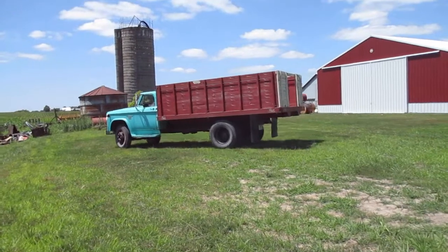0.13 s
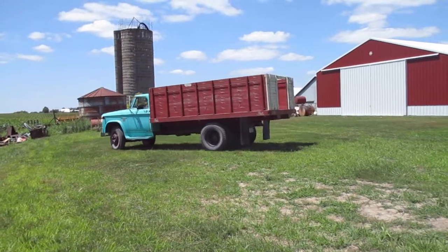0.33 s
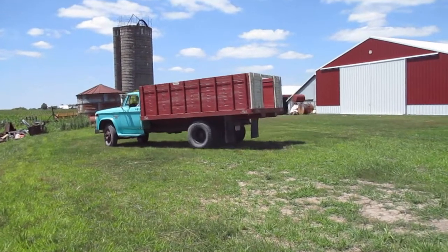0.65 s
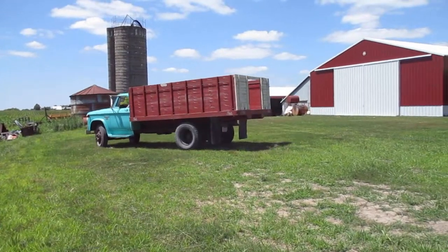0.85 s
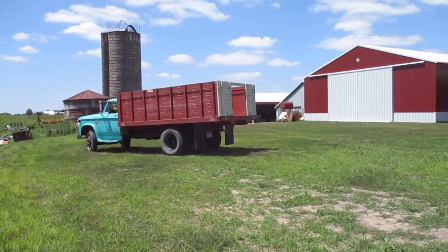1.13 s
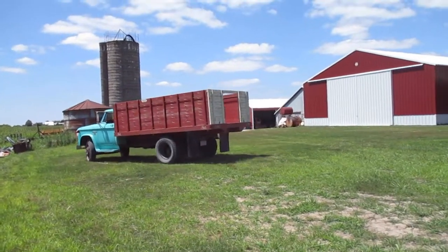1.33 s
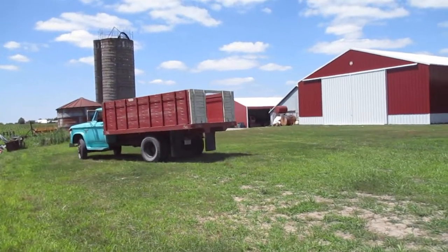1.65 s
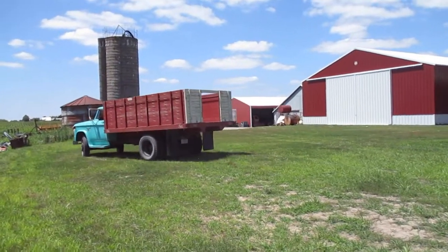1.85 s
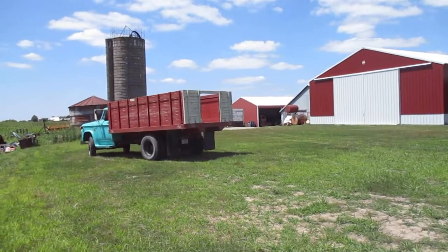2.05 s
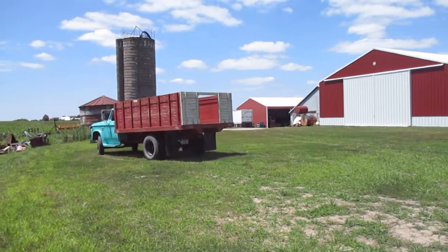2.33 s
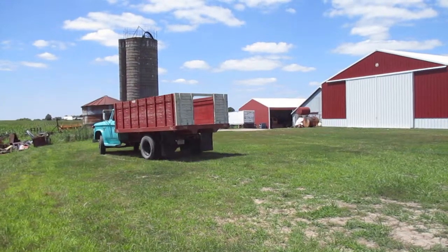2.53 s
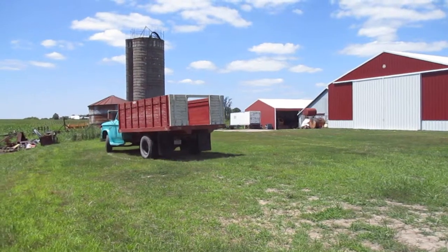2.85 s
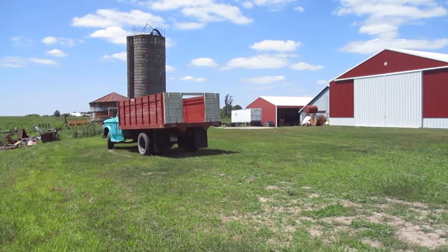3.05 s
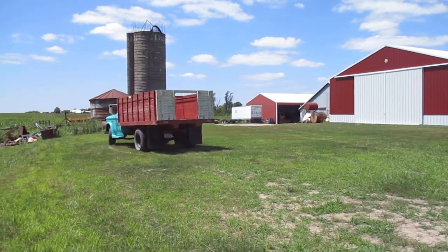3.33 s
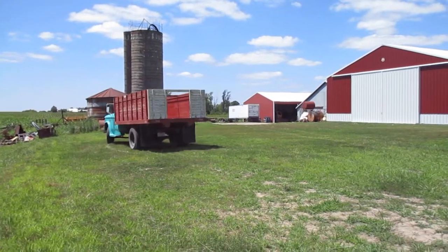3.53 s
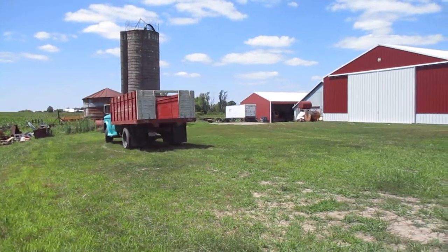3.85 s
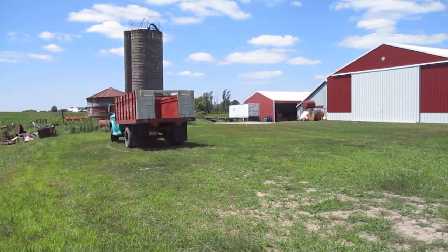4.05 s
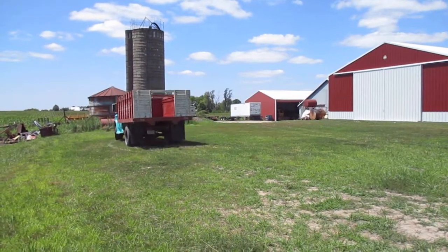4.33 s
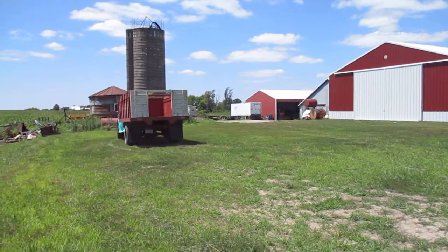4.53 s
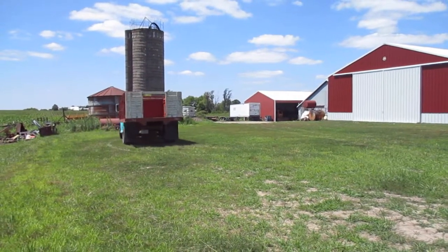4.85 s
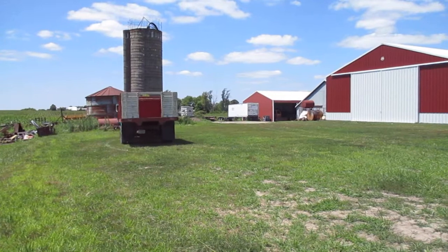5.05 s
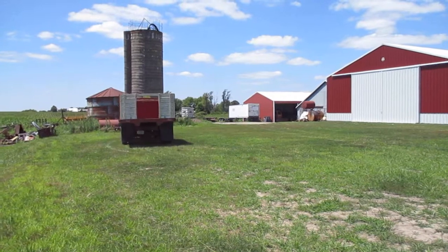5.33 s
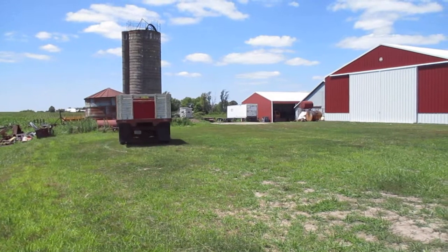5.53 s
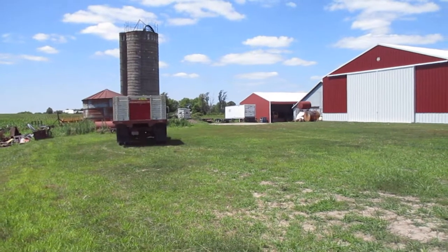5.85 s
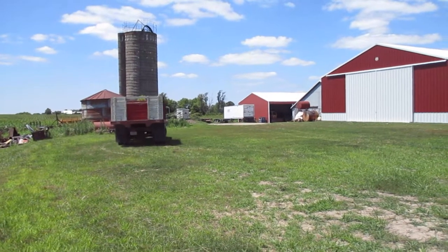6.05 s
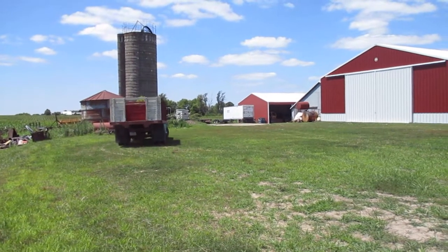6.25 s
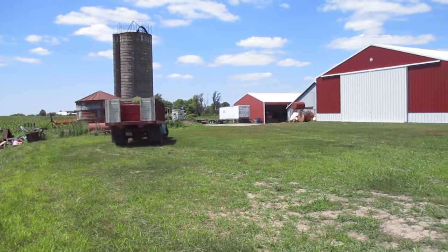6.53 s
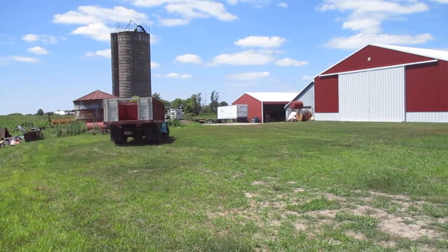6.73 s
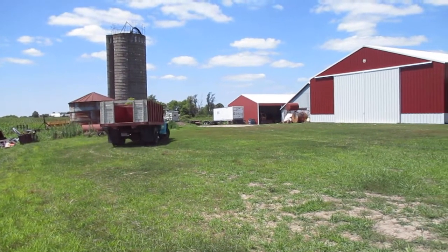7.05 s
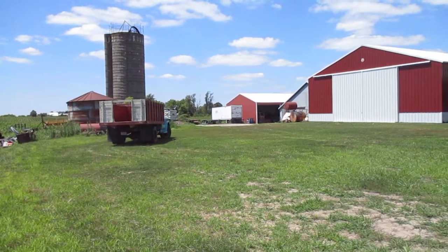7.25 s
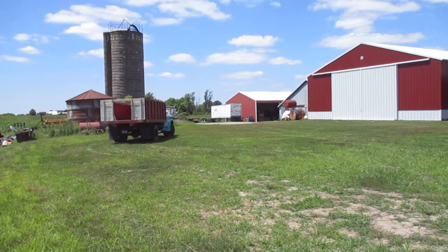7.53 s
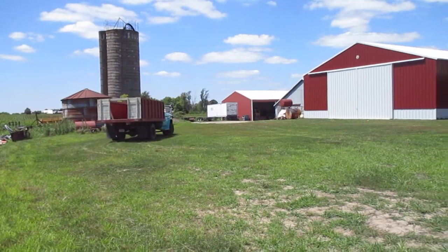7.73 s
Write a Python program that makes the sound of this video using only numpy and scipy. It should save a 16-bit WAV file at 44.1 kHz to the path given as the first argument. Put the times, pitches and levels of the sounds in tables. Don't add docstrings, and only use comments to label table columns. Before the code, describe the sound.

Outdoors on a grassy farm yard, an old petrol truck crawls away at steady low revs, its exhaust throbbing unevenly with ticking valves, hissing fan and buzzing panels. A few dry stalks snap near the microphone around two to three seconds. Later the engine softens and wind gusts thump the bare microphone, the hardest just after six seconds, briefly ducking the level. Thin high crickets and tiny bird whistles sit behind.

```python
import sys
import numpy as np
from scipy import signal
from scipy.io import wavfile
from scipy.ndimage import uniform_filter1d

SR = 44100
rng = np.random.default_rng(int(sys.argv[2]) if len(sys.argv) > 2 else 0)


def master(y):
    cut = np.clip(np.atleast_2d(y).T, -1, 1)
    pcm = np.round(cut * 32767)
    wavfile.write(sys.argv[1], SR, pcm.astype(np.int16))


def decibels_to_gain(level_db):
    exponent = np.asarray(level_db, float) / 20
    return 10 ** exponent


N = 348369


def rms_one(x):
    return x / np.sqrt(np.mean(x ** 2) + 1e-20)


def in_time(rows):
    s, *columns = np.transpose(rows)
    return [np.interp(np.arange(N) / SR, s, c) for c in columns]


def band(x, low_hz, high_hz, order=2):
    edges = [low_hz, min(high_hz, .45 * SR)]
    return signal.sosfilt(signal.butter(order, edges, "band", fs=SR, output="sos"), x)


def drift(rate):
    r = np.exp(-80 * np.pi * rate / SR)
    slow = signal.lfilter([1], [1, -2 * r, r * r], rng.standard_normal(N // 40 + 2002))[2000:]
    return np.interp(np.arange(N) / 40, np.arange(len(slow)), rms_one(slow))


def resonance(x, hz, width_hz):
    r = np.exp(-np.pi * width_hz / SR)
    poles = [1, -2 * r * np.cos(2 * np.pi * hz / SR), r * r]
    return signal.lfilter(np.array([1, 0, -1]) * (1 - r * r) / 2, poles, x + 1e-18)


def clicks(seconds, sizes):
    at = np.round(np.asarray(seconds) * SR).astype(int)
    inside = (at >= 0) & (at < N)
    return np.bincount(at[inside], np.asarray(sizes)[inside], N)


# [t/s, speed/cycles per s]
SPEED = [(0.0, 12.653), (0.65, 12.752), (0.95, 12.599), (1.95, 12.97), (2.25, 13.215), (2.7, 12.565),
         (3.1, 13.123), (3.6, 12.512), (4.0, 13.052), (4.5, 12.64), (4.9, 13.049), (5.4, 12.569),
         (5.7, 12.939), (6.2, 12.647), (6.5, 12.752), (7.05, 12.584), (7.35, 12.678), (7.9, 12.699)]
START_CYCLES = .041


def moments(cycles):
    turned = START_CYCLES + np.cumsum(in_time(SPEED)[0]) / SR
    early = np.minimum(cycles - turned[0], 0) / SPEED[0][1]
    late = np.maximum(cycles - turned[-1], 0)
    return np.interp(cycles, turned, np.arange(N) / SR) + early + late


# [blow level/dB, extra pipe delay/ms]
CYLINDERS = [(-5.5, -2.5), (-9.5, -6), (-8.5, -3), (-6, -2), (-13, 1.5), (-3.5, -2.5), (-4, -2),
             (-12.5, -6)]


def firings(uneven_db, jitter_ms):
    level_db, delay_ms = np.tile(CYLINDERS, (102, 1)).T
    chance = rng.standard_normal((len(level_db), 2))
    late_s = (delay_ms + jitter_ms * chance[:, 0]) / 1000
    when = moments(np.arange(len(level_db)) / 8) + late_s
    return clicks(when, decibels_to_gain(level_db + uneven_db * chance[:, 1]))


# [f/Hz, width/Hz, level/dB]
PIPE = [(63.84, 8.4, -49.5), (117.7, 16.7, -50.5), (141.5, 34.7, -55.5)]
MUFFLER_HZ, MUFFLER_Q = 219.4, 4.4


def exhaust(blows):
    lead = round(2 * SR / 12.75)
    blows = np.r_[blows[:lead], blows]
    out = 0
    for k, (hz, width, db) in enumerate(PIPE):
        out = out + (-1) ** k * decibels_to_gain(db) * resonance(blows, hz, width)
    w = 2 * np.pi * MUFFLER_HZ
    chamber = signal.bilinear([w * w], [1, w / MUFFLER_Q, w * w], SR)
    return rms_one(signal.lfilter(*chamber, signal.lfilter(*chamber, out))[lead:])


def shaken(blows, modes, decay_ms, steady, tonal, wander_db):
    r = np.exp(-1000 / (decay_ms * SR))
    puffs = steady + rms_one(signal.lfilter([1], [1, -r], blows))
    drive = rms_one(puffs * rng.standard_normal(N)) + tonal * rms_one(blows)
    out = 0
    for k, (hz, width, db) in enumerate(modes):
        rung = resonance(resonance(drive, hz, width), hz, 2 * width)
        out = out + (-1) ** k * decibels_to_gain(db + wander_db * drift(2.77)) * rung / np.sqrt(width)
    return rms_one(out)


# [f/Hz, width/Hz, level/dB]
BODY = [(239.4, 23, -2), (277.6, 40, 1.5), (359, 98, -9), (428.8, 30, 1), (520.5, 67, -9.5),
        (620.3, 41, -6), (785, 180, -24), (1031, 46, -14), (1211, 77, -17.5)]
BODY_DB = -29
BODY_SHADED = 0.72


def body(blows, bay_db):
    shake = shaken(blows, BODY, decay_ms=9.0, steady=1.5, tonal=1.7, wander_db=1.6)
    return decibels_to_gain(BODY_DB + BODY_SHADED * bay_db) * shake


# [f/Hz, width/Hz, level/dB]
BLOCK = [(1972, 100, -7), (2403, 380, 2), (2814, 120, -5), (3126, 340, -0.5), (4110, 530, -8),
         (5650, 940, -9)]
BLOCK_DB = -40.5


def block(blows, bay_db, rattle_db):
    shake = shaken(blows, BLOCK, decay_ms=3.0, steady=1.2, tonal=.01, wander_db=2.5)
    return decibels_to_gain(BLOCK_DB + bay_db + rattle_db) * shake


# [f/Hz, level/dB per Hz]
HISS = [(700, 2), (1020, -1.5), (1720, -6.5), (2400, -8), (3790, -12), (5740, -16), (9400, -19.5),
        (15600, -39.5)]
FAN_DB = -36.5


def fan(bay_db, patchy_db):
    hz_points, db_points = np.transpose(HISS)
    edges = 600 * 2 ** np.arange(0, 5.1, .5)
    white = rng.standard_normal((2, N))
    out = 0
    for k, (low, high) in enumerate(zip(edges, edges[1:])):
        db = np.interp(np.log(low * high) / 2, np.log(hz_points), db_points)
        out = out + decibels_to_gain(db + patchy_db * drift(13.0)) * band(white[k % 2], low, high)
    return decibels_to_gain(FAN_DB + bay_db) * rms_one(out)


# [crank angle/firing slots, level/dB]
VALVES = [(1.15, -1.5), (2.3, -7), (3.349, -9.5), (4.201, -17), (5.201, -20), (6.1, -18), (7.25, -9.5)]
# [f/Hz, level/dB, t60/s]
VALVE_RING = [(2420, 1, .025), (3050, -1, .018), (4150, -5, .02), (4550, -6, .02), (5750, -2, .013),
              (6300, -4, .012), (7300, -6, .008), (7900, -9, .009), (8300, -9, .008), (9200, -11, .007)]
# [t/s, level/dB]
TAPPETS = [(0, -32), (1.5, -41.5), (2.6, -36.5), (3.7, -36), (4.7, -35), (5.8, -35), (6.7, -40.5),
           (7.2, -38.5), (7.9, -33.5)]


def valves(uneven_db):
    slot, level_db = np.transpose(VALVES)
    when = moments((np.arange(102)[:, None] + slot / 8).ravel())
    whole_db = np.tile(level_db, 102) + .6 * uneven_db * rng.standard_normal(len(when))
    out = 0
    for hz, db, t60 in VALVE_RING:
        strikes = clicks(when, decibels_to_gain(whole_db + db + uneven_db * rng.standard_normal(len(when))))
        rattle = signal.lfilter([1], [1, -.995], strikes + 1e-18) * rng.standard_normal(N)
        r, w = decibels_to_gain(-60 / (t60 * SR)), 2 * np.pi * hz / SR
        out = out + 0.087 * signal.lfilter([0, np.sin(w)], [1, -2 * r * np.cos(w), r * r], rattle)
    return decibels_to_gain(in_time(TAPPETS)[0]) * band(out, 1800, 13000)


# [t/s, exhaust level/dB, open engine bay level/dB, rattle over bumps level/dB]
TRUCK = [(0, -15, -1, 2), (1, -13.5, -2.5, -0.5), (1.5, -12.5, -4, -1.5), (1.9, -13.5, -3.5, -1),
         (2.3, -15, -3.5, -6.5), (2.7, -12, -4.5, 1), (3.2, -15.5, -5.5, -1.5), (3.6, -11.5, -5.5, -0.5),
         (3.85, -14, -6.5, 4.5), (4.3, -13.5, -6.5, 1), (4.9, -14.5, -7.5, -4.5), (5.2, -14.5, -10, 2),
         (5.6, -14.5, -10.5, 6.5), (5.9, -18.5, -12.5, 3), (6.5, -20.5, -13.5, 1.5), (7, -16, -10, -4.5),
         (7.2, -17, -9, 4), (7.9, -17, -8.5, 3.5)]
LOW_CUT_HZ = 48
BOOM_SHARE, BOOM_FADE_S = 0.56, 1.0


def truck(blows):
    exhaust_db, bay_db, rattle_db = in_time(TRUCK)
    pipe = band(exhaust(blows), LOW_CUT_HZ, 4000)
    near = np.exp(-(np.arange(N) / SR / BOOM_FADE_S) ** 2)
    boom = BOOM_SHARE * near * resonance(pipe, PIPE[0][0], 20)
    out = decibels_to_gain(exhaust_db) * (pipe + boom)
    out += body(blows, bay_db) + block(blows, bay_db, rattle_db)
    return out + fan(bay_db, patchy_db=1.5) + valves(uneven_db=3.5)


# [from t/s, to t/s, f/Hz, level/dB]
BUZZES = [(1.25, 1.547, 292, -34.5), (2.1, 2.5, 287, -36.5), (1.45, 3.7, 625, -45), (3.5, 4.6, 620, -44),
          (4.6, 5.2, 633, -43), (-.1, .6, 2360, -46), (-.1, 1.1, 3060, -47), (3.8, 4.9, 5800, -58),
          (.45, .95, 284, -36), (3.75, 4.2, 2610, -51), (4.45, 5.45, 428.6, -38), (5.138, 5.324, 3070, -46),
          (3.25, 3.6, 280, -38), (7.033, 7.62, 2390, -48), (7.71, 7.9, 3070, -55)]
PANEL_Q = 17


def panels(blows):
    out, t = 0, np.arange(N) / SR
    for start, end, hz, db in BUZZES:
        touch = np.clip(np.minimum(t - start, end - t) / (0.19 * (end - start)), 0, 1)
        mode = [(hz, hz / PANEL_Q, 0)]
        buzz = shaken(blows, mode, decay_ms=3.0, steady=.8, tonal=.3, wander_db=0)
        out = out + decibels_to_gain(db) * touch * buzz
    return out


def eddy(width_ms):
    t = np.arange(-600, 600) / SR * 1000 / width_ms
    return (1 - t * t - .2 * t * (t * t - 3)) * np.exp(-t * t / 2)


# [t/s, level/dB]
GUST = [(0, -38.5), (.15, -29), (2, -33), (4.1, -37), (4.4, -27.5), (5.1, -23.5), (5.4, -29.5),
        (5.65, -17.5), (6.1, -19.5), (6.25, -30), (6.45, -23.5), (7.1, -28.5), (7.3, -41), (7.9, -30)]
# [t/s, peak level/dB, width/ms, push 1 or suck -1]
THUMPS = [(4.4441, -14, 1.5, 1), (4.5361, -14, 1.5, -1), (4.6151, -5.5, 1.4, 1), (4.6812, -10, 1.1, -1),
          (4.7151, -9.5, 1.4, 1), (4.8488, -11, 1.25, 1), (4.9796, -15, 1.2, -1), (5.3097, -16.5, 0.85, -1),
          (5.5502, -8, 2.1, 1), (5.6219, -10, 1.65, -1), (5.6513, -8, 2.2, -1), (5.6834, -14, 1.8, 1),
          (5.7334, -5, 1.36, 1), (5.7903, -12, 1.4, 1), (5.8325, -7, 1.9, 1), (5.9039, -9, 2.1, 1),
          (5.8625, -15.5, 1.2, 1), (6.0259, -11, 1.3, 1), (6.0591, -11, 1.05, 1), (6.1162, -18, 2.1, -1),
          (6.3496, -14.5, 2, 1), (6.4284, -5.5, 1.47, -1), (6.4872, -8, 2.6, -1), (6.6738, -15.5, 0.93, 1),
          (6.7398, -15, 2.2, -1), (6.7922, -6, 2.14, -1)]
# [t/s, peak level/dB, width/ms, push 1 or suck -1]
SLAP = (6.1485, -.8, 1.35, 1)
SLAP_FRONT = (6.1479, -24, .2, 1)


def wind():
    rumble = rms_one(band(band(rng.standard_normal(N), 50, 197), 40, 330))
    out = decibels_to_gain(in_time(GUST)[0] - 2.0 + 3.6 * drift(16.0)) * rumble
    for s, db, width_ms, push in [*THUMPS, SLAP, SLAP_FRONT]:
        at = round(s * SR) - 600
        out[at:at + 1200] += np.sign(push) * decibels_to_gain(db + 2.0) * eddy(width_ms)
    return out


CHIRP_SPREAD_DB, CHIRP_SPREAD_HZ = 1.0, 35


def cricket(bouts, gap_s, length, wing_hz, strokes_per_s):
    out, t = np.zeros(N + SR), np.arange(round(length * SR)) / SR
    swell = np.abs(np.sin(np.pi * t / t[-1])) ** .45
    for first, last, db in bouts:
        for s in np.linspace(first, last, round((last - first) / gap_s) + 1):
            louder, higher = rng.standard_normal(size=2)
            hz = wing_hz + CHIRP_SPREAD_HZ * higher
            strokes = np.maximum(np.sin(2 * np.pi * (strokes_per_s * t + rng.random())) + 0.96, 0)
            scrape = rms_one(resonance(rng.standard_normal(4000)[:len(t)], hz, 350))
            wing = .6 * scrape + np.sin(2 * np.pi * hz * t)
            at = max(round((s - length / 2) * SR), 0)
            out[at:][:len(t)] += decibels_to_gain(db + CHIRP_SPREAD_DB * louder) * swell * strokes * wing
    return out[:N]


# [first chirp t/s, last chirp t/s, level/dB]
SLOW_BOUTS = [
    (.115, .645, -63),
    (.865, 1.765, -57.5),
    (1.965, 3.215, -56.5),
    (3.415, 5.675, -55.5),
    (5.895, 7.765, -59),
]
FAST_BOUTS = [
    (.02, .62, -56),
    (1.14, 1.74, -56.5),
    (2.18, 2.53, -60),
    (3.76, 3.97, -60),
    (4.38, 5.1, -56),
    (5.48, 6.09, -57),
    (6.54, 7.25, -59.5),
    (7.69, 7.81, -58),
]


def crickets():
    slow = cricket(SLOW_BOUTS, gap_s=.184, length=.068, wing_hz=9660, strokes_per_s=138)
    fast = cricket(FAST_BOUTS, gap_s=.12, length=.046, wing_hz=9930, strokes_per_s=145)
    return slow + fast


# [t/s, peak level/dB, f/Hz]
SNAPS = [(1.1228, -38, 12000), (2.162, -29.5, 12000), (2.4159, -31, 12000), (2.419, -28.5, 11700),
         (2.672, -29.5, 11400), (2.902, -22, 8100), (2.903, -20, 6200), (2.903, -23, 10600),
         (2.9265, -33.5, 12200), (5.5588, -30.5, 10400), (7.1217, -38, 12000)]


def snaps():
    out = np.zeros(N)
    for s, db, hz in SNAPS:
        burst = rng.standard_normal(300) * np.exp(-np.arange(300) / 9.0)
        burst = band(burst, .55 * hz, 1.2 * hz)
        out[round(s * SR):][:300] += decibels_to_gain(db + 4.0) * burst / np.abs(burst).max()
    return out


# [t/s, length/s, from f/Hz, to f/Hz, level/dB]
BIRD = [
    (1.812, 0.036, 2440, 2560, -35),
    (1.891, 0.036, 2450, 2430, -34),
    (3.495, 0.024, 3500, 3400, -39),
    (3.518, 0.022, 3460, 3830, -36.5),
    (3.537, .022, 3190, 2930, -40),
    (3.88, .04, 2900, 2700, -41),
    (6.86, .035, 3600, 3850, -51),
    (7.053, 0.037, 3550, 3850, -44),
    (7.2, 0.035, 3500, 3570, -43),
    (7.353, 0.038, 3480, 3780, -42),
]


def bird():
    out = np.zeros(N)
    for s, length, from_hz, to_hz, db in BIRD:
        part = np.linspace(0, 1, round(length * SR))
        waver = uniform_filter1d(rng.standard_normal(len(part)), size=90)
        pitch = from_hz + (to_hz - from_hz) * part ** 2 + 600 * waver
        whistle = np.sin(np.pi * part) * np.sin(2 * np.pi * np.cumsum(pitch) / SR)
        out[round(s * SR):][:len(part)] += decibels_to_gain(db) * whistle
    return out


def scene():
    blows = firings(uneven_db=.45, jitter_ms=.05)
    return (truck(blows) + panels(blows) + wind() + crickets() + snaps() + bird())[None]


def low_pass(x):
    return signal.sosfilt(signal.butter(12, 15820, fs=SR, output="sos"), x)


WHINE_HZ, WHINE_DB = 11793, -70.5
LIMIT_DB, RELEASE_DB_S = -3.5, 18.5


def record(dry):
    ramp = RELEASE_DB_S * np.arange(N) / SR
    over_db = np.maximum(20 * np.log10(np.abs(dry[0]) + 1e-9) - LIMIT_DB, 0)
    held_db = np.maximum.accumulate(over_db + ramp) - ramp
    r = np.exp(-1 / (0.015 * SR))
    duck_db = signal.lfilter([1 - r], [1, -r], held_db)
    whine = decibels_to_gain(WHINE_DB - 5) * np.sin(2 * np.pi * WHINE_HZ * np.arange(N) / SR + 1.2 * drift(3))
    ducked = (dry + whine) * decibels_to_gain(-duck_db)
    top_cut = signal.cheby2(12, 70, 16700, fs=SR, output="sos")
    mix = signal.sosfilt(top_cut, np.clip(ducked, -1, 1))
    return low_pass(mix)


dry = scene()
out = record(dry)
master(out)
```